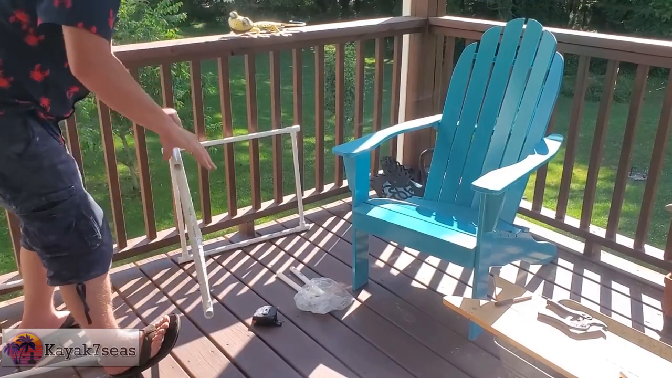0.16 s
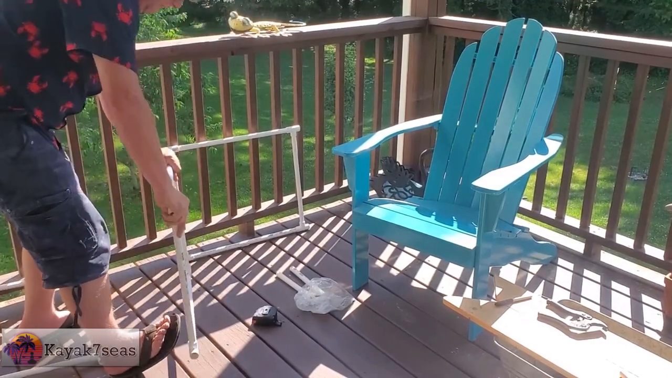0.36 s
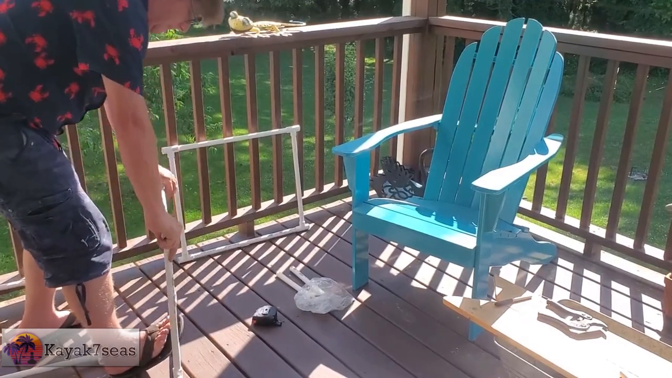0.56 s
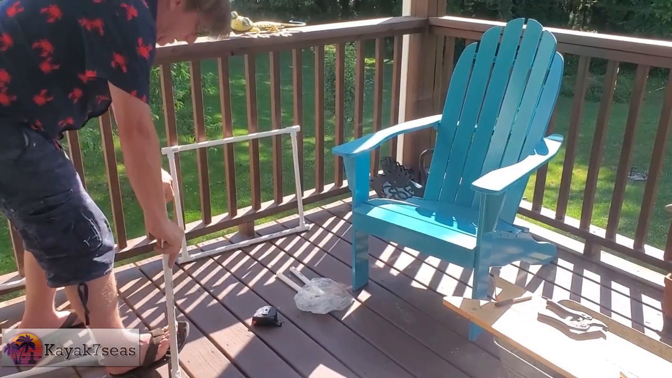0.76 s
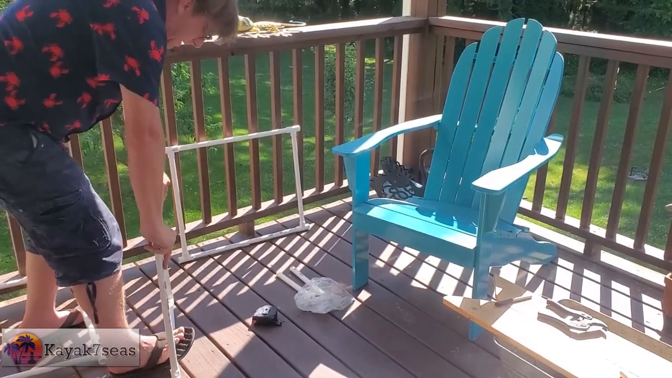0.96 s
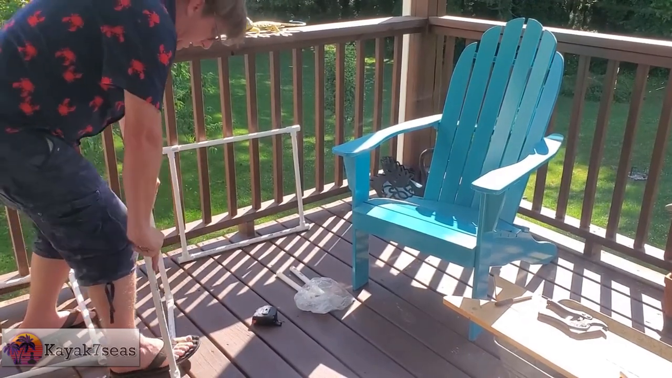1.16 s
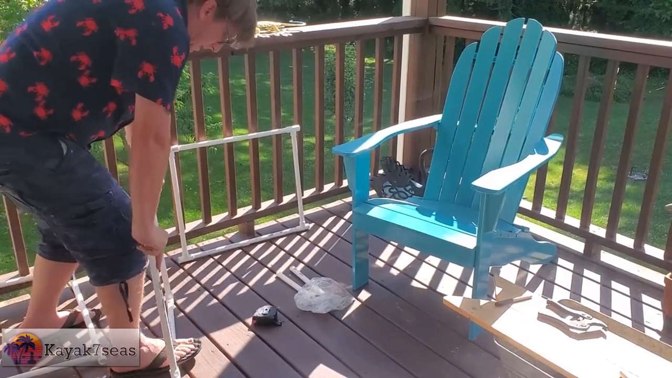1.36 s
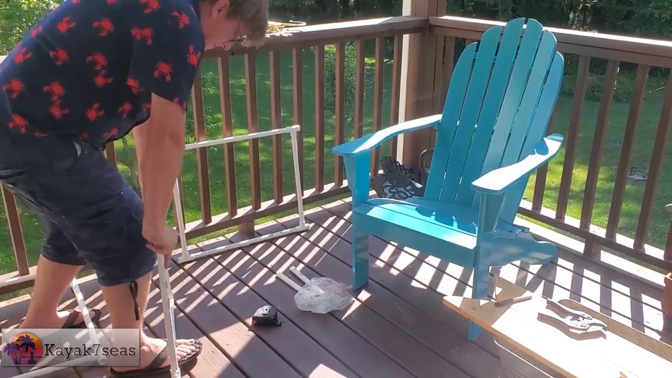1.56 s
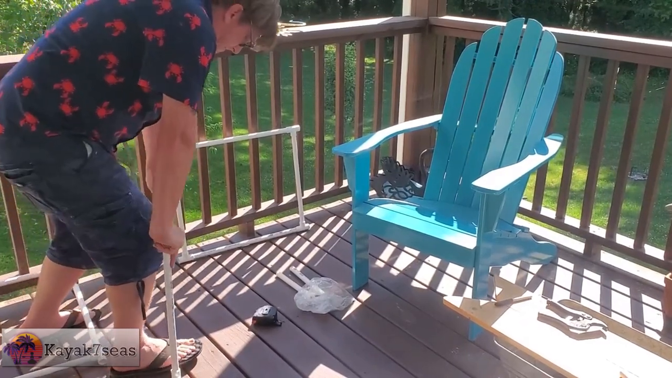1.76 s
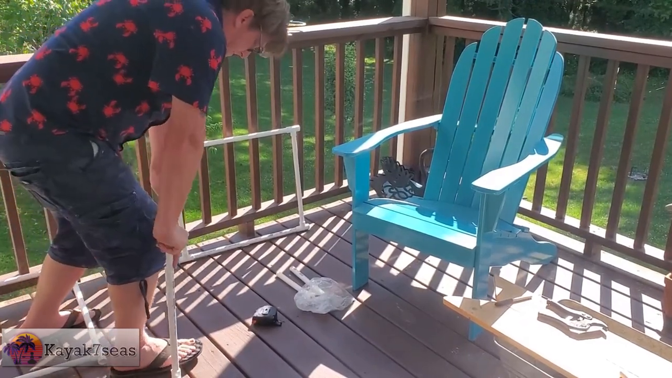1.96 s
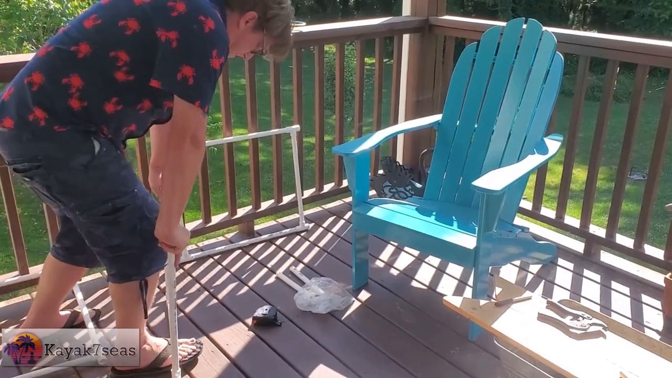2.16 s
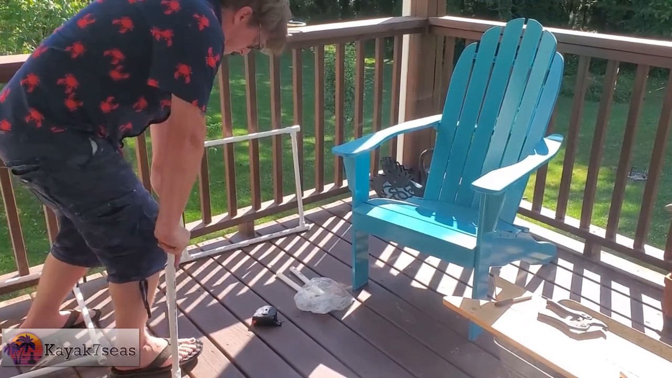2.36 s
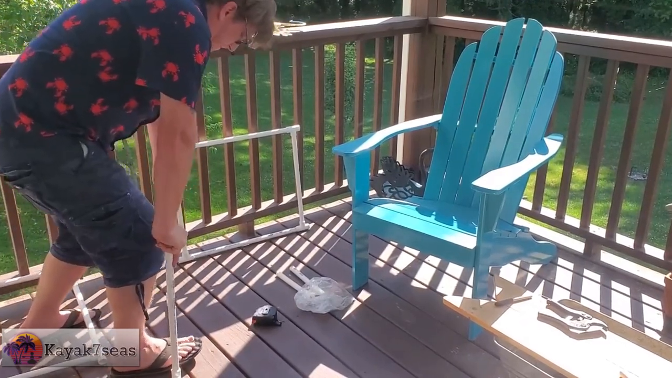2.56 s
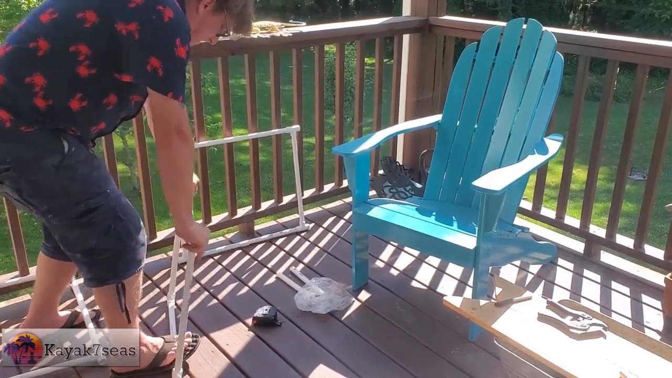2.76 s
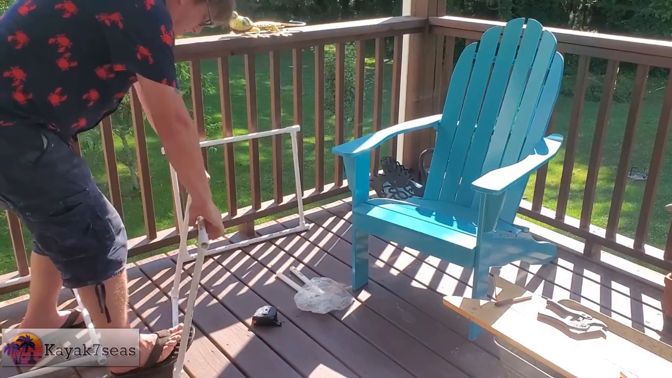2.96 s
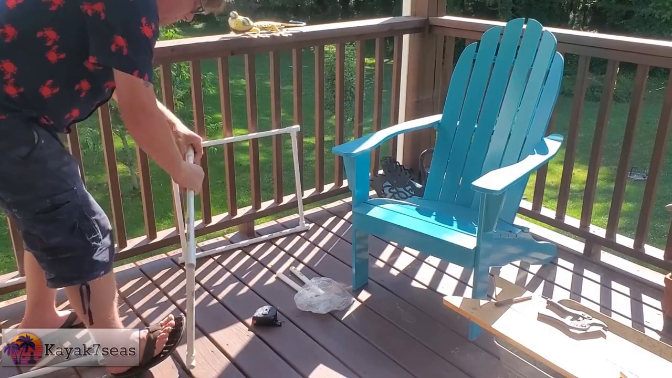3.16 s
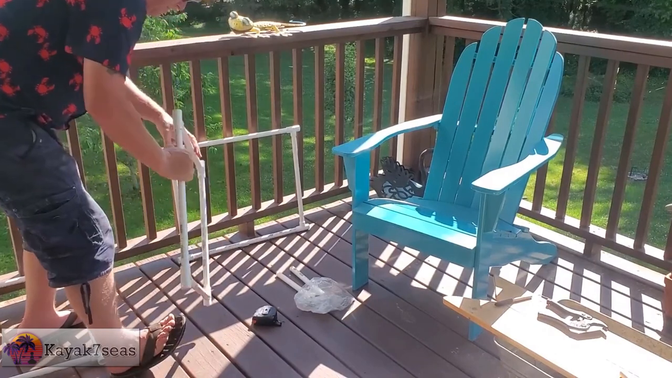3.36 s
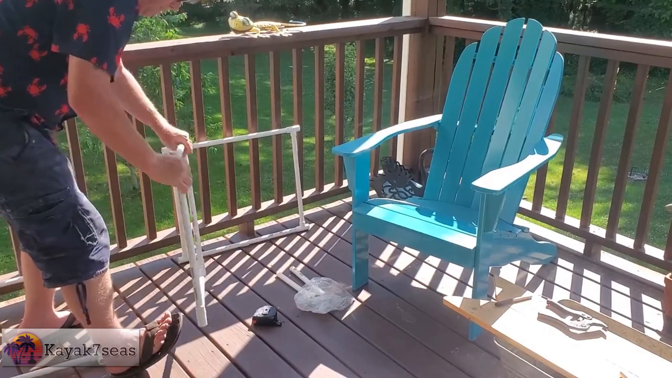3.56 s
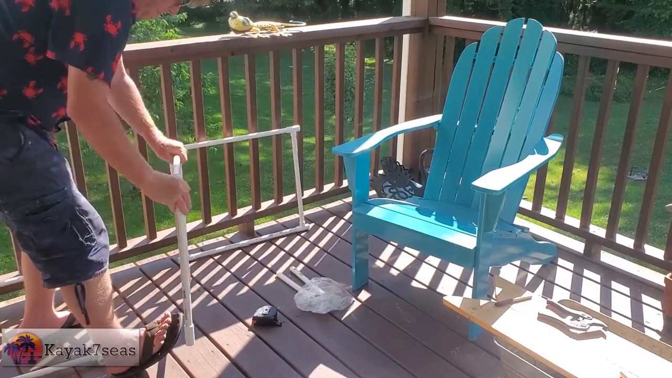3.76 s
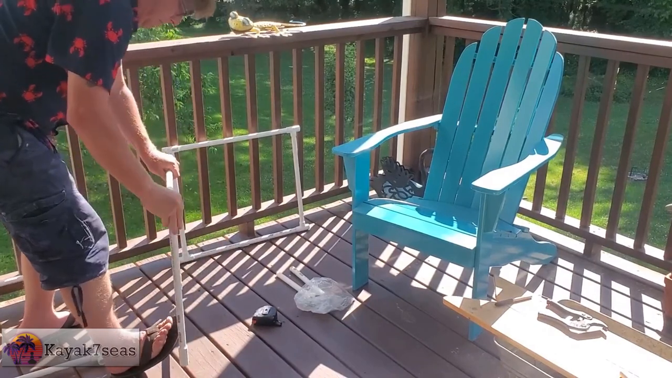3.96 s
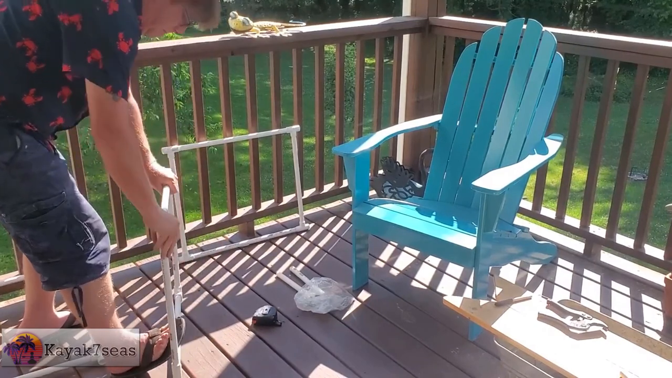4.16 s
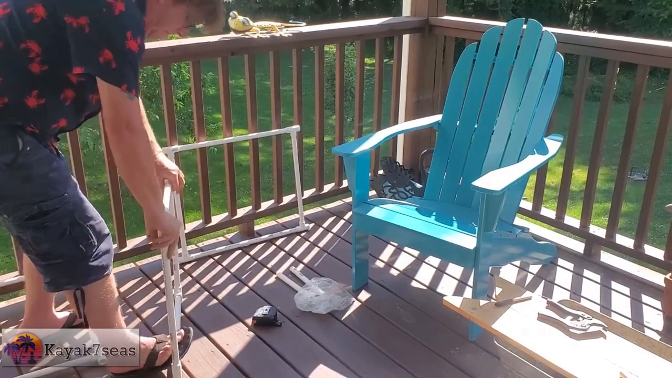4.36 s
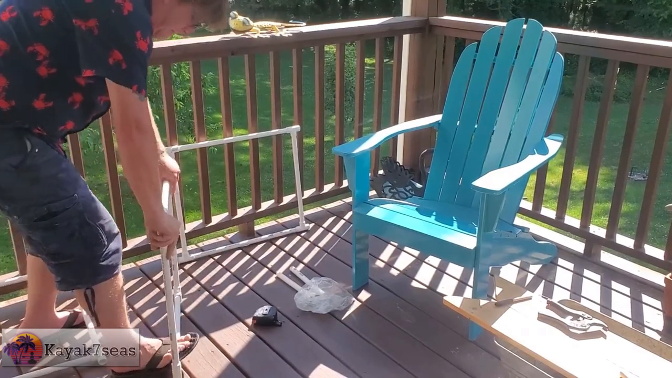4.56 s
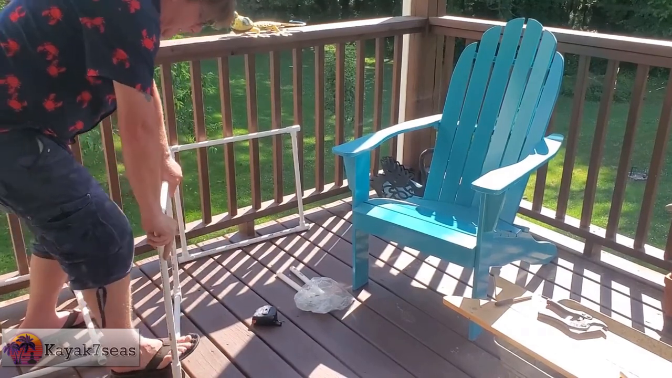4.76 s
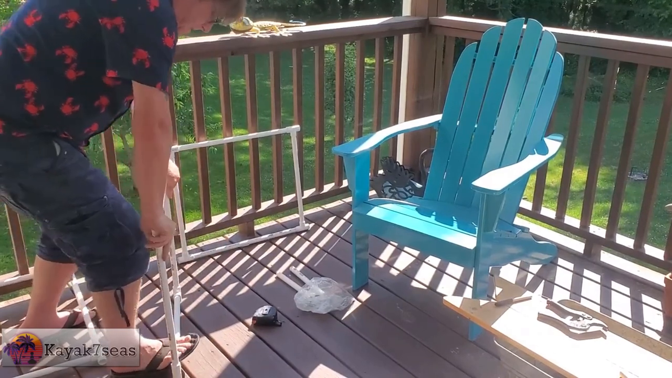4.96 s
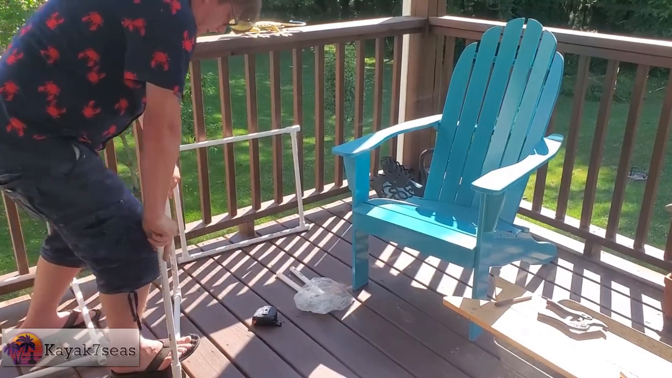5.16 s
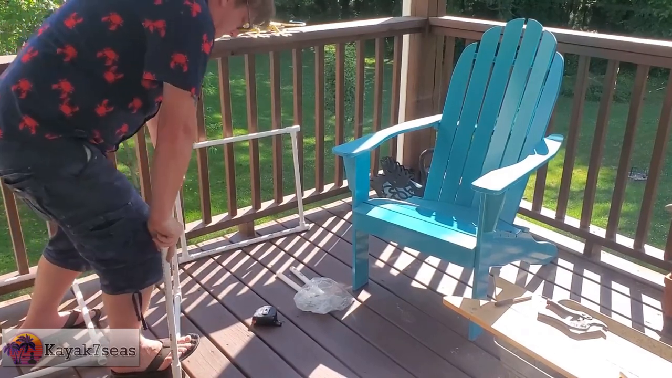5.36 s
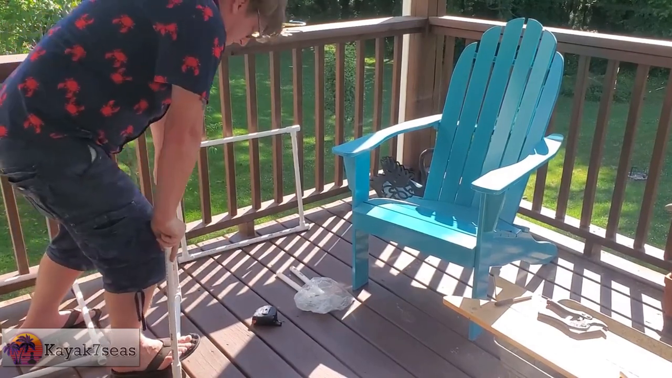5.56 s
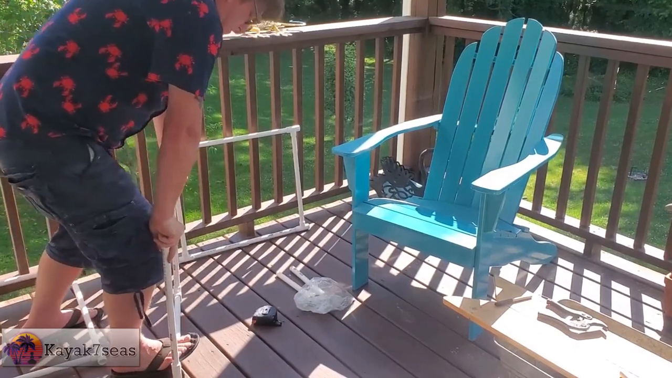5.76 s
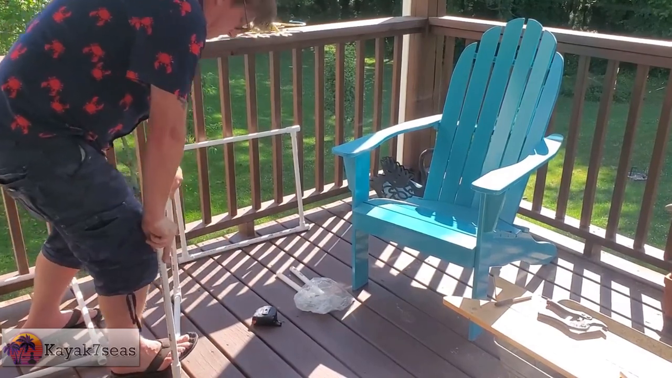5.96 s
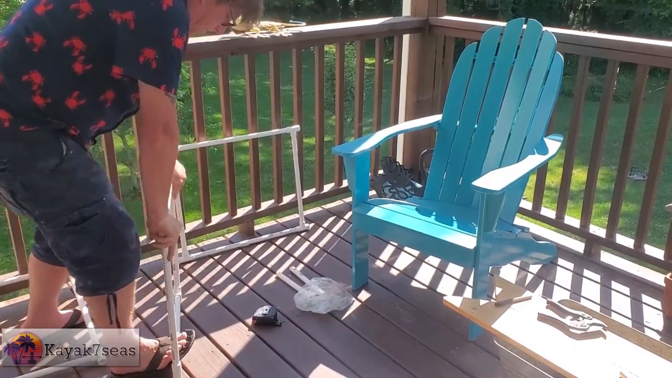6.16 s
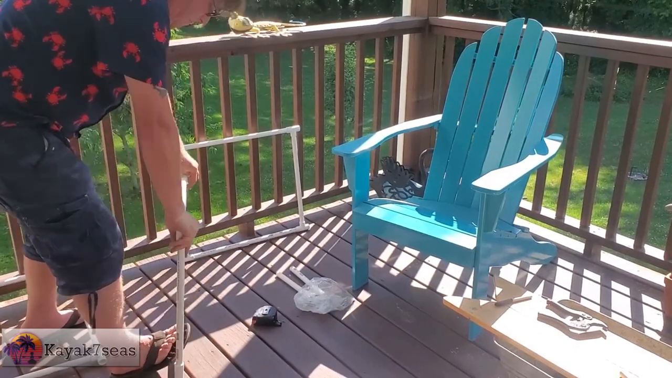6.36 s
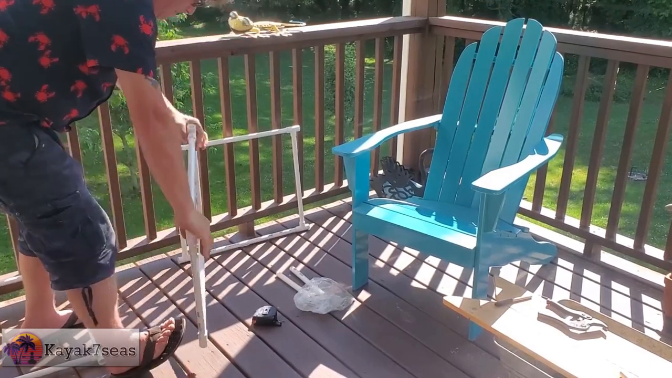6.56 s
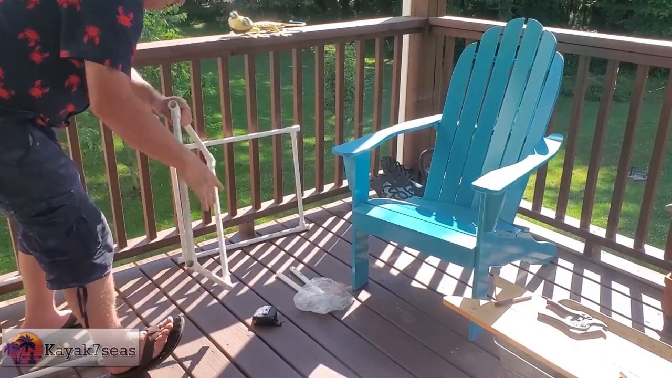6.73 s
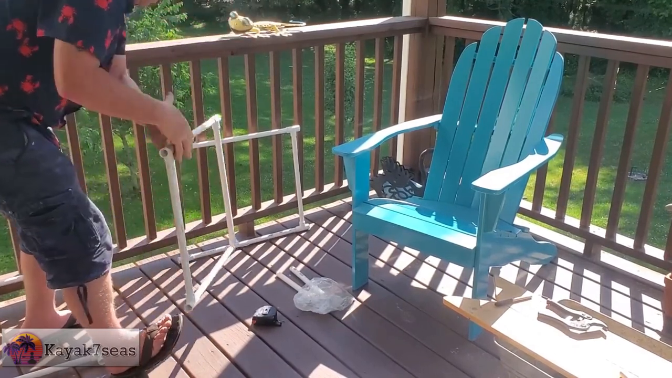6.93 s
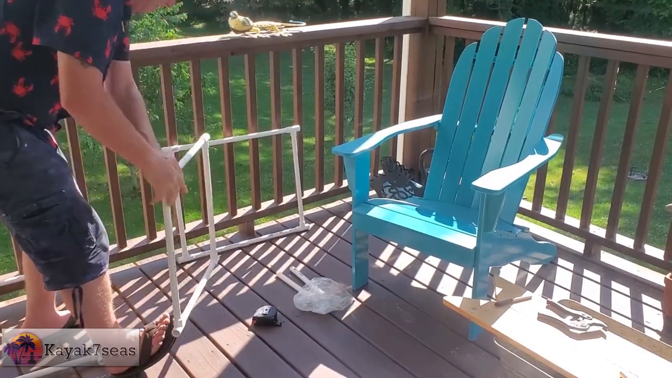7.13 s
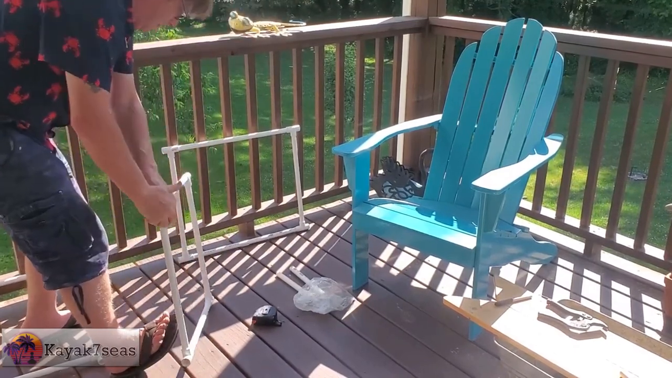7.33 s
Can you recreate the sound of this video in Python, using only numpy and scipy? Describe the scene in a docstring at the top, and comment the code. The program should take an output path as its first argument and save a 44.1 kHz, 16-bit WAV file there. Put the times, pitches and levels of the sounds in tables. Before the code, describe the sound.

Hollow knocks of plastic pipe on wooden boards, small joint clicks and rustling hands, outdoors with a bird chirping faintly.

```python
"""A plastic pipe frame is set down and pressed on a roofed wooden deck, close to a stereo microphone.
Boards and pipe walls ring at each knock, joints snap and rasp as they seat, hands and cloth rustle.
A songbird repeats one phrase from the trees; further off are a warbler and a thin whistle.
A distant vehicle gathers speed over a quiet neighbourhood's hum; a breeze rumbles on the microphone."""
import sys
import numpy as np
from scipy import signal
from scipy.io import wavfile

SR = 44100
rng = np.random.default_rng(int(sys.argv[2]) if len(sys.argv) > 2 else 0)


def wrap_up_sound(samples):
    """Save the sound to the file named by the first command line argument, as 16-bit audio."""
    columns = np.atleast_2d(samples).T
    # keep every value between -1 and 1, then stretch to whole-number steps
    tamed = np.clip(columns, -1, 1)
    steps = np.round(tamed * 32767).astype(np.int16)
    wavfile.write(sys.argv[1], SR, steps)


N = 330571


def from_db(db):
    """Decibels to gain."""
    return 10 ** (np.asarray(db) / 20)


def rms_one(x):
    """Scale to rms 1."""
    return x / np.sqrt(np.mean(x ** 2) + 1e-20)


def in_time(rows):
    """Columns of a curve table, sample by sample."""
    time_s, *columns = np.transpose(rows)
    return [np.interp(np.arange(N) / SR, time_s, column) for column in columns]


def at_hz(points, hz):
    """Read a spectrum on a log-frequency axis."""
    freq_hz, values = np.transpose(points)
    return np.interp(np.log(hz), np.log(freq_hz), values)


def drift(rate_hz):
    """Smooth random wander, rms 1."""
    pole = np.exp(-80 * np.pi * rate_hz / SR)
    slow = signal.lfilter([1], [1, -2 * pole, pole * pole], rng.standard_normal(N // 40 + 2002))[2000:]
    return np.interp(np.arange(N) / 40, np.arange(len(slow)), rms_one(slow))


def held(start_s, hold_s, db, rise_db_per_s, fall_db_per_s):
    """Gain that rises until start_s, holds and falls."""
    t = np.arange(N) / SR - start_s
    return from_db(db - rise_db_per_s * np.maximum(-t, 0) - fall_db_per_s * np.maximum(t - hold_s, 0))


def band(x, low_hz, high_hz):
    """Butterworth band-pass."""
    return signal.sosfilt(signal.butter(2, [low_hz, high_hz], "band", fs=SR, output="sos"), x)


def clicks(at, db):
    """One click of uneven strength at each given sample."""
    train = np.zeros(N)
    train[at] = from_db(db + rng.normal(0, 1.5, len(at)))
    return train


def ring(force, hz, t60_s, phase=0):
    """A unit click sets a sine of height 1 ringing."""
    r, w = from_db(-60 / (t60_s * SR)), 2 * np.pi * hz / SR
    feedback = [1, -2 * r * np.cos(w), r * r]
    return signal.lfilter([np.sin(phase), r * np.sin(w - phase)], feedback, force + 1e-18)


def echoes(x, hold_s, t60_s):
    """Dense echoes, unrelated left and right: even until hold_s, then dying."""
    t = np.arange(SR // 2) / SR
    shape = from_db(-60 * np.maximum(t - hold_s, 0) / t60_s) * (t > .001)
    return signal.fftconvolve(x[None], shape * rng.standard_normal((2, len(t))), axes=1)[:, :N]


def far_tone(hz, db, waver_db, rate_hz):
    """A sine whose level wavers on its way through the air."""
    return np.sqrt(2) * from_db(db + waver_db * drift(rate_hz)) * np.sin(2 * np.pi * np.cumsum(hz) / SR)


def add_note(out, start_s, length_s, first_hz, last_hz, db, octave_db):
    """One gliding bird note with soft ends and a faint octave."""
    progress = np.linspace(0, 1, int(length_s * SR))
    phase = 2 * np.pi * np.cumsum(first_hz + (last_hz - first_hz) * np.sqrt(progress)) / SR
    swell = from_db(db) * np.sin(np.pi * progress)
    i = int(start_s * SR)
    out[i:i + len(swell)] += swell * (np.sin(phase) + from_db(octave_db) * np.sin(2 * phase))


# Outdoor air all around the deck: freq_hz, relative_density_db
AIR_SPECTRUM = [(15, 7.5), (30, -15.5), (70, -1.5), (110, -10.5), (180, -16.5), (350, -16), (800, -22.5),
                (1500, -28), (2400, -35), (4000, -66), (6700, -36), (12000, -37.5), (16000, -72)]
# How alike that air is left and right: freq_hz, correlation
AIR_LIKENESS = [(25, 0.86), (70, 0.96), (200, 1), (500, 0.39), (1200, 0.022), (4000, 0.017), (16000, 0.018)]
# Steady drones in the distance: centre_hz, width_hz, level_db
DRONES = [(86.86, 4, -64), (75.7, 1.4, -75.5), (460, 35.5, -72.5), (1512, 25, -81)]

def neighbourhood():
    """The bed of the place: wavering third-octave bands of noise, plus narrow drones."""
    edges_hz = 16 * 2 ** np.arange(0, 10.2, 1 / 3)
    white = rng.standard_normal((2, 2, N))
    air = 0
    for k, (low, high) in enumerate(zip(edges_hz, edges_hz[1:])):
        mid, side = band(white[k % 2], low, high)
        hz = np.sqrt(low * high)
        alike = at_hz(AIR_LIKENESS, hz)
        stereo = np.sqrt(1 + alike) * mid + np.sqrt(1 - alike) * side * [[1], [-1]]
        air += from_db(at_hz(AIR_SPECTRUM, hz) + 1.5 * drift(6.6)) * stereo
    drones = sum(from_db(db) * rms_one(band(rng.standard_normal(N), hz - width / 2, hz + width / 2))
                 for hz, width, db in DRONES)
    return from_db(-55.5) * rms_one(air) + drones


# Engine firing rate: time_s, pitch_hz
ENGINE_PITCH = [(0, 61), (1.9, 57.4), (3.5, 62.67), (5.6, 73.23), (7.5, 80.5)]
# The engine as heard from the deck: time_s, level_db
ENGINE_LEVEL = [(0, -56.5), (1.2, -67.5), (1.9, -61), (2.3, -57), (3.3, -51), (3.8, -55), (4.0, -67),
                (4.3, -55), (5.3, -52.5), (5.6, -74), (7.5, -75)]

def vehicle():
    """A distant engine's firing note, climbing as it gathers speed."""
    return far_tone(*in_time(ENGINE_PITCH), *in_time(ENGINE_LEVEL), waver_db=2.5, rate_hz=3.2)


# Wind at the microphone: time_s, level_db
GUSTS = [(0, -78), (.75, -51.5), (1.3, -77), (2.3, -66), (3.3, -65), (5.2, -60), (6, -87), (7.5, -81)]

def breeze():
    """Wind makes a lumpy deep rumble, its own in each microphone port, stronger on the left."""
    lumps = [from_db(2.7 * drift(5.6)) * rms_one(band(rng.standard_normal(N), 24, 42)) for _ in range(2)]
    return from_db(in_time(GUSTS)[0]) * from_db([[1.2], [-1.2]]) * lumps


# Bursts of a far whistle: start_s, hold_s, level_db
WHISTLE_BURSTS = [(0, 0.28, -81), (1.0, .63, -82), (1.878, 0.069, -75), (2.17, .05, -70),
                  (2.42, 0.11, -75.5)]

def whistle():
    """A thin, far tone that wavers and slowly sags in pitch."""
    hz = 2278 - 13 * np.arange(N) / SR
    bursts = sum(held(*burst, rise_db_per_s=152, fall_db_per_s=152) for burst in WHISTLE_BURSTS)
    return bursts * np.array([far_tone(hz, 0, waver_db=3.5, rate_hz=15) for _ in range(2)])


# Far warbler, a high note then a low one: start_s, high_hz, low_hz, source_db
WARBLE_PAIRS = [(3.29, 3050, 2350, -79), (3.57, 3020, 2285, -79), (3.8, 3110, 2360, -81),
                (3.969, 3000, 2470, -81), (4.30, 3080, 2496, -79.5), (4.541, 3050, 2495, -77),
                (6.03, 2940, 2396, -83), (6.241, 3070, 2360, -78.5), (6.509, 3270, 2460, -79.5),
                (6.755, 3010, 2500, -80), (6.96, 3000, 2510, -88)]
# Lone high notes, as far off: start_s, length_s, pitch_hz, source_db
LONE_PEEPS = [(2.62, .1, 5030, -85), (4.399, 0.017, 7880, -76)]

def warbler():
    """A bird so far off that only its echo arrives; each note glides up to just under its listed pitch."""
    voice = np.zeros(N)
    notes = list(LONE_PEEPS)
    for start_s, high_hz, low_hz, db in WARBLE_PAIRS:
        notes += [(start_s, 0.073, high_hz, db), (start_s + 0.06, 0.088, low_hz, db - 1.5)]
    for start_s, length_s, hz, db in notes:
        add_note(voice, start_s, length_s, 0.94 * hz, 0.98 * hz, db, octave_db=-54)
    voice *= drift(120)   # leaves scatter the voice into a narrow hiss
    return from_db(-14.5) * echoes(voice, hold_s=0.0066, t60_s=0.7)


# Notes of the songbird's phrase: offset_s, length_s, first_hz, last_hz, relative_db, octave_db
PHRASE_NOTES = [(-.06, 0.02, 4470, 4010, -13.5, -37), (-.005, 0.103, 3604, 3534, -1, -14.5),
                (0.055, 0.073, 3532, 3488, 2.5, -19), (0.138, 0.058, 2715, 2682, -3.5, -51),
                (0.183, 0.026, 5260, 5090, -15.5, -40), (0.232, 0.018, 3220, 3396, -9.5, -44),
                (0.24, 0.037, 3865, 3637, -3.5, -38), (.265, 0.029, 3036, 2950, -5, -41),
                (0.284, 0.044, 3003, 2847, -11.5, -48)]
# Each phrase from the trees: start_s, level_db, tuning_ratio, closing_notes_db, chirp_tuning_ratio
PHRASE_REPEATS = [(.515, -52.5, 1.004, -1.5, 1.01), (1.012, -53, 1, -1.5, 1.02),
                  (3.146, -53.5, 0.98, 1, 0.95), (3.646, -51.5, 0.99, 0, 0.96),
                  (4.852, -50.5, .995, 0, 1.001), (6.172, -50.5, 0.99, -2, 1.01)]

def songbird():
    """The nearer bird, a little to the right, retunes one phrase each time; the trees echo it."""
    voice = np.zeros(N)
    for start_s, song_db, tuning, closing_db, chirp_tuning in PHRASE_REPEATS:
        for offset_s, length_s, first_hz, last_hz, db, octave_db in PHRASE_NOTES:
            db += song_db + closing_db * (offset_s > .1) + rng.normal(0, 1.5)
            is_chirp = 3650 < first_hz < 3900
            ratio = chirp_tuning if is_chirp else tuning
            add_note(voice, start_s + offset_s, length_s, ratio * first_hz, ratio * last_hz, db, octave_db)
    voice *= from_db(1.9 * drift(37))   # the air makes the notes flutter
    voice *= 1 + 0.31 * drift(87)   # and roughens them
    trees = from_db(-39.5) * echoes(voice, hold_s=0.011, t60_s=0.83)
    return voice * from_db([[-1.5], [1.5]]) + trees


# Hands and cloth sliding near the microphone: start_s, hold_s, high_hiss_db, broad_hiss_db
HAND_STROKES = [(.28, .03, -71, -80), (0.52, .05, -65.5, -69), (0.768, 0.019, -62, -70),
                (1.567, 0.04, -73, -86), (2.76, .05, -66, -63), (2.92, .14, -55, -64.5),
                (3.11, 0.027, -47.5, -60.5), (3.343, 0.27, -57, -64.5), (3.846, 0.041, -61.5, -71),
                (5.666, .03, -76, -65), (5.962, .02, -72, -85), (6.257, 0.13, -68, -63),
                (7.16, 0.02, -64, -72.5)]
# Faint stirring between strokes: time_s, high_hiss_db, broad_hiss_db
STIRRING = [(0, -90, -75.5), (2.4, -87, -74), (4.0, -75, -68.5), (6.0, -72.5, -70.5), (7.5, -71.5, -65)]

def rustle():
    """Hands on the pipe and moving cloth shed fine friction grains, unrelated left and right."""
    high_gain, broad_gain = from_db(in_time(STIRRING))
    for start_s, hold_s, high_db, broad_db in HAND_STROKES:
        stroke = held(start_s, hold_s, 0, rise_db_per_s=98, fall_db_per_s=172)
        high_gain = np.hypot(high_gain, from_db(high_db) * stroke)
        broad_gain = np.hypot(broad_gain, from_db(broad_db) * stroke)
    grains = rng.standard_normal((2, N)) * from_db(1.5 * rng.exponential(1, (2, N)))
    high_hiss = rms_one(band(grains, 8670, 14000))
    broad_hiss = rms_one(band(grains[:, ::-1], 1400, 16300))
    return from_db(0.52 * drift(23)) * (high_gain * high_hiss + broad_gain * broad_hiss)


ROOF_T60_S = 0.24
# Modes of the boards underfoot: pitch_hz, gain_db, t60_s, left_minus_right_db, left_lead_rad
BOARD_MODES = [(109, -14, 0.033, 30.5, 0.66), (185, -8.5, 0.11, -21, 0.61), (214.2, -3.5, 0.17, 5, -0.51),
               (287.8, 2, 0.14, -7.5, -0.7), (336, -3, 0.18, -7, -1.25), (382.3, -0.5, 0.16, 7.5, -0.097),
               (451, 4.5, 0.057, 7, 0.71), (534, -11, 0.073, -12, 0.69), (637, 2, 0.068, -2.5, 1),
               (699.5, -17.5, 0.13, -24.5, 1)]

def deck_boards(at, thump_db, knock_db, edge_db):
    """Struck boards ring under the roof: low joist thump, middle knock, higher board edge."""
    boards = np.zeros((2, N))
    for k, (hz, db, t60_s, pan_db, lead_rad) in enumerate(BOARD_MODES):
        force_db = thump_db if hz < 320 else knock_db if hz < 560 else edge_db
        force = (-1) ** k * clicks(at, db + force_db)
        boards += [from_db(side * pan_db) * ring(force, hz, t60_s, side * lead_rad) for side in (.5, -.5)]
    boards = np.roll(band(boards, 67, 1100), int(0.00283 * SR), axis=1)   # they answer softly and late
    boards += from_db(-31.5) * echoes(boards.mean(0), hold_s=0.008, t60_s=ROOF_T60_S)
    mid = boards.mean(0)
    return mid + band(boards - mid, 420, 3000)   # long waves reach both ports alike


# Modes of the plastic pipe: pitch_hz, gain_db, t60_s
WALL_MODES = [(813, -6.5, 0.038), (972, -9, 0.048), (1220, 4.5, 0.011), (1514, 1.5, 0.016),
              (1752, -5, 0.024), (2238, -12, 0.015), (2590, 0.5, 0.0088), (3050, -0.5, 0.0036),
              (4240, -1.5, 0.003), (1910, -4, 0.0071), (3740, -10.5, 0.0016)]

def pipe_walls(at, latest, rasp, wall_db, joint_db):
    """Clicks and rasp ring the pipe: low modes are the wall's clack, high ones the joint's snap."""
    pipe = 0
    for k, (hz, db, t60_s) in enumerate(WALL_MODES):
        force_db = db + (wall_db if hz < 1650 else joint_db)
        force = clicks(at, force_db - 2) + from_db(force_db[latest] - 25.5) * rasp
        pipe += (-1) ** k * ring(force, hz, t60_s)
    return pipe


def slip_rasp(since_s, slip_s):
    """Gritty friction as the pipe slips after a touch, 6 dB down after slip_s."""
    fade = (since_s > 0) * from_db(-6 * (since_s / slip_s) ** 2)
    return fade * rng.standard_normal((2, N)) * from_db(2 * rng.exponential(1, N))


# The frame lands and bounces on the deck: start_s, thump_db, knock_db, edge_db, wall_db, crack_db
LANDINGS = [(0.5689, -40.5, -43.5, -59, -42.5, -63), (0.5841, -36, -43, -38.5, -42.5, -68),
            (0.597, -24.5, -32, -28, -29.5, -57.5), (0.6192, -35.5, -24.5, -34, -43, -61),
            (0.6593, -39, -46, -48, -54, -73), (0.6899, -50, -43.5, -59, -53, -71),
            (1.8245, -52, -69, -57.5, -56.5, -67), (2.7904, -53.5, -77, -64, -61, -85),
            (4.1258, -25, -30, -23.5, -32.5, -52.5), (4.1505, -62, -22.5, -36, -43.5, -76),
            (4.1802, -36, -29, -58, -39.5, -62), (4.2104, -31.5, -32.5, -54, -49, -71),
            (4.4536, -50.5, -54, -63, -60, -76), (6.2105, -50.5, -57, -57, -50.5, -74),
            (7.3501, -33.5, -39, -44.5, -36, -54), (7.3658, -35, -32, -46, -53, -55),
            (7.3785, -36, -65, -44, -65, -74)]
# Joints snap or slide home: start_s, joint_db, wall_db, crack_db, slip_s
JOINT_SNAPS = [(1.5393, -63, -79, -78, 0.033), (2.0954, -35.5, -49.5, -53, 0.045),
               (2.2176, -42.5, -56, -49.5, 0.024), (2.7279, -55, -65, -70, 0.16),
               (4.6493, -42.5, -49.5, -48.5, 0.023), (4.846, -55, -69, -66, 0.029),
               (5.9955, -69, -79, -71, 0.043), (6.252, -53.5, -59.5, -66, 0.058)]

def pipe_frame():
    """Close up, each touch strikes boards and pipe, cracks and slips; roof and posts throw it back."""
    landing_slip_s, snap_to_boards_db = 0.027, -28
    touches = [(s, wall - 1, thump, knock, edge, wall, crack, landing_slip_s)
               for s, thump, knock, edge, wall, crack in LANDINGS]
    touches += [(s, joint, *[joint + snap_to_boards_db] * 3, wall, crack, slip)
                for s, joint, wall, crack, slip in JOINT_SNAPS]
    start_s, joint_db, thump_db, knock_db, edge_db, wall_db, crack_db, slip_s = np.transpose(sorted(touches))
    at = (start_s * SR).astype(int)
    latest = np.maximum(np.searchsorted(at, np.arange(N), "right") - 1, 0)   # last touch at each sample
    rasp = slip_rasp((np.arange(N) - at[latest]) / SR, slip_s[latest])
    boards = deck_boards(at, thump_db, knock_db, edge_db)
    pipe = pipe_walls(at, latest, rasp, wall_db, joint_db)
    crack = band(clicks(at, crack_db + 28) + from_db(crack_db[latest] + 6) * rasp, 4030, 12600)
    plastic = pipe + crack
    roof = from_db(-33) * echoes(plastic.mean(0), hold_s=0.0051, t60_s=ROOF_T60_S)
    return boards + plastic + roof


def scene():
    """Everything that reaches the microphone on the deck, left and right."""
    left, right = neighbourhood() + vehicle()
    street = np.array([np.roll(left, int(.0005 * SR)), right])   # off to the right: the left hears it late
    return pipe_frame() + rustle() + songbird() + warbler() + whistle() + street + breeze()


# Treble dips of the microphone ports: centre_hz, width_hz, depth_fraction
MIC_DIPS = [(8730, 1450, 0.8), (9620, 4600, 0.83)]

def record(dry):
    """The microphone ports leave a broad dip in the treble; the top is cut."""
    for hz, width_hz, depth in MIC_DIPS:
        dry = dry - depth * signal.lfilter(*signal.iirpeak(hz, hz / width_hz, SR), dry)
    return signal.sosfilt(signal.cheby2(16, 70, 16200, fs=SR, output="sos"), dry)


dry = scene()
out = record(dry)
wrap_up_sound(out)
```